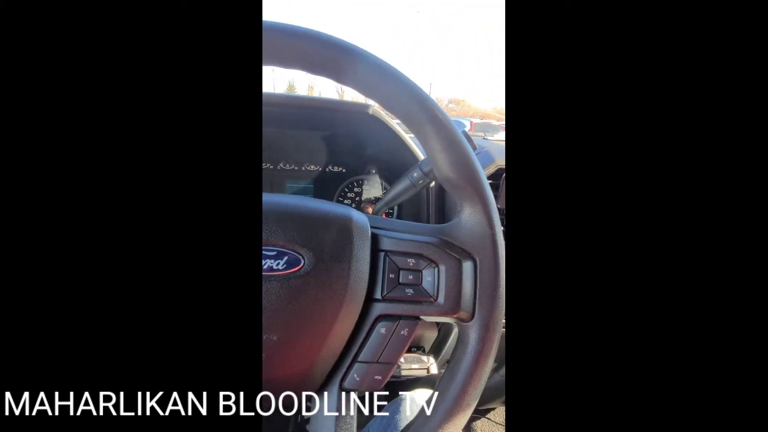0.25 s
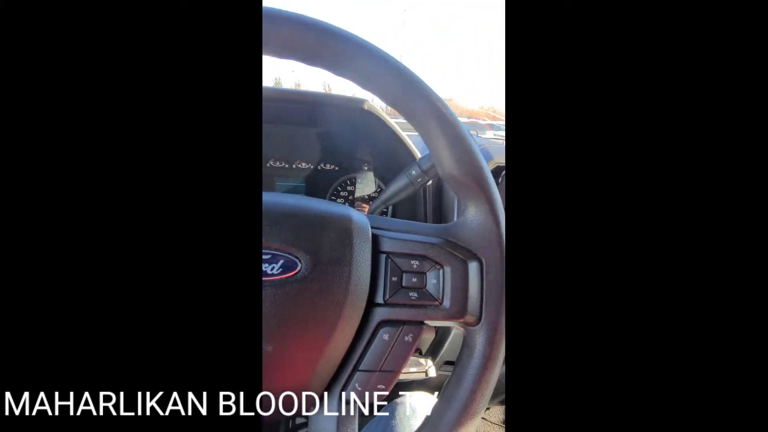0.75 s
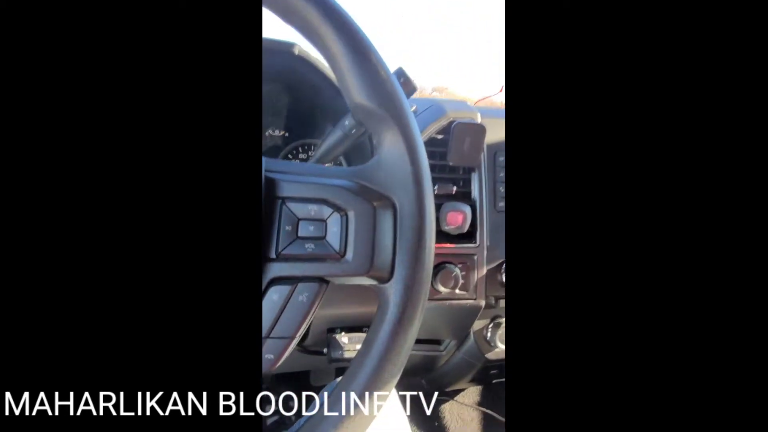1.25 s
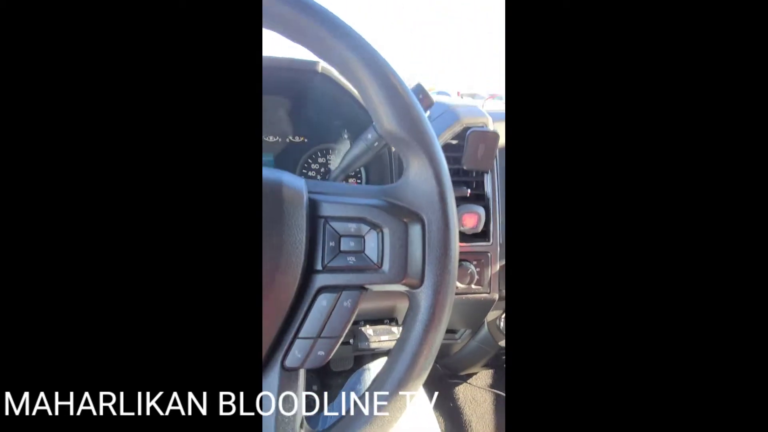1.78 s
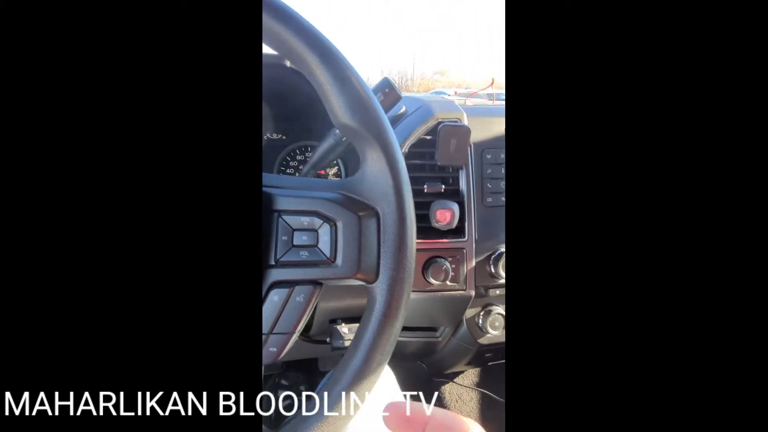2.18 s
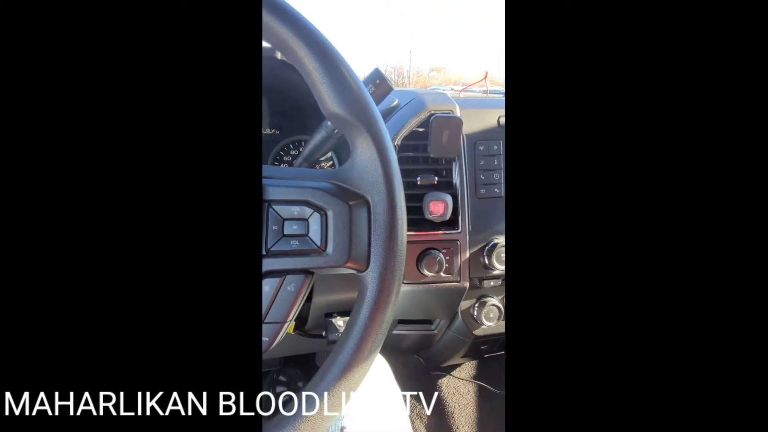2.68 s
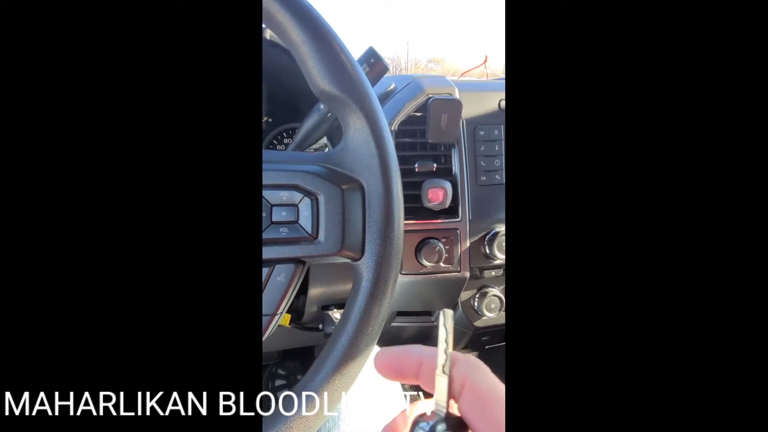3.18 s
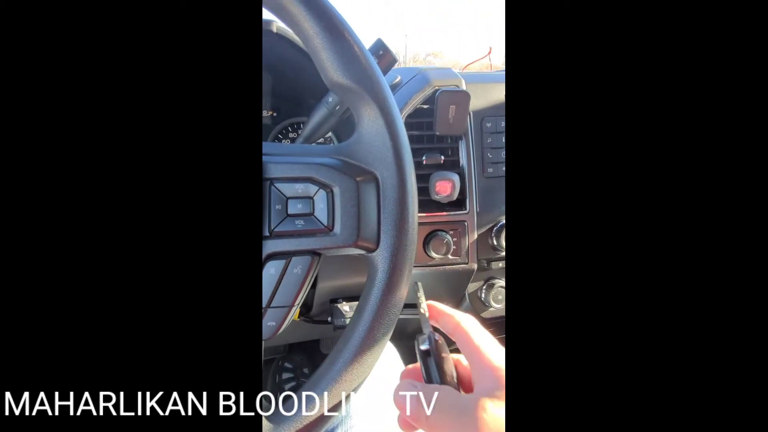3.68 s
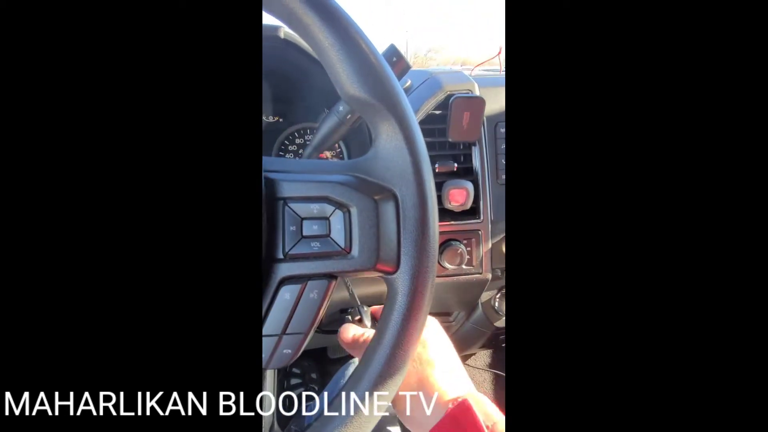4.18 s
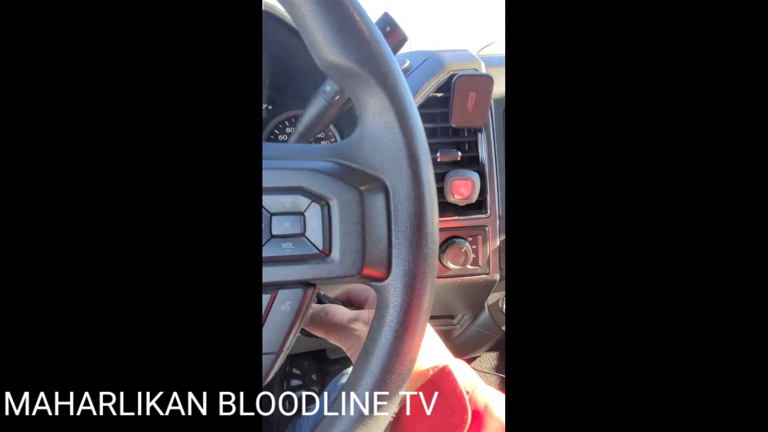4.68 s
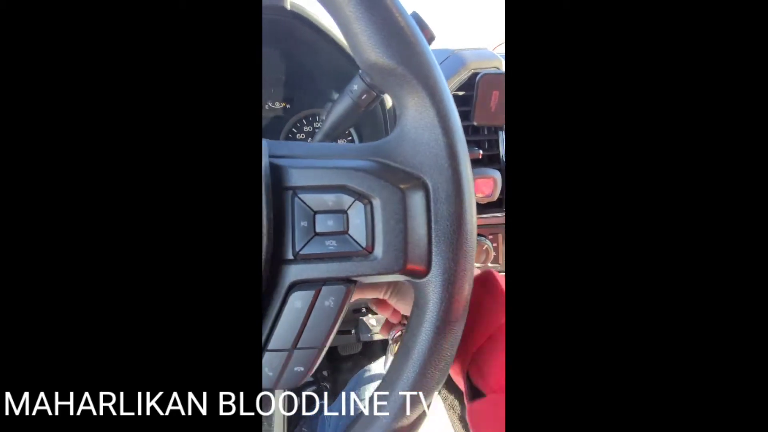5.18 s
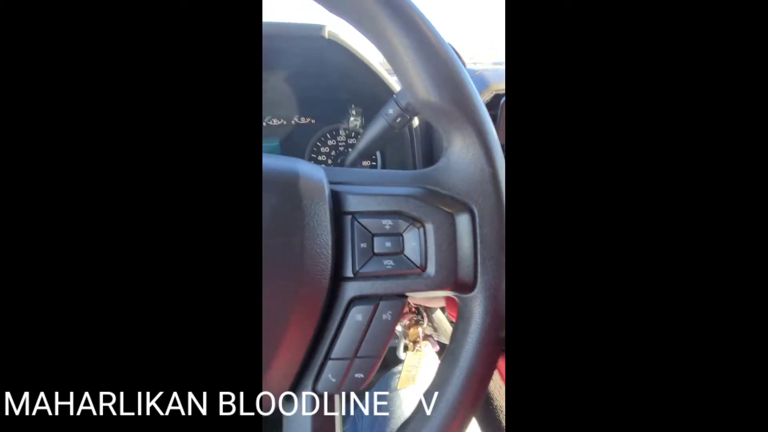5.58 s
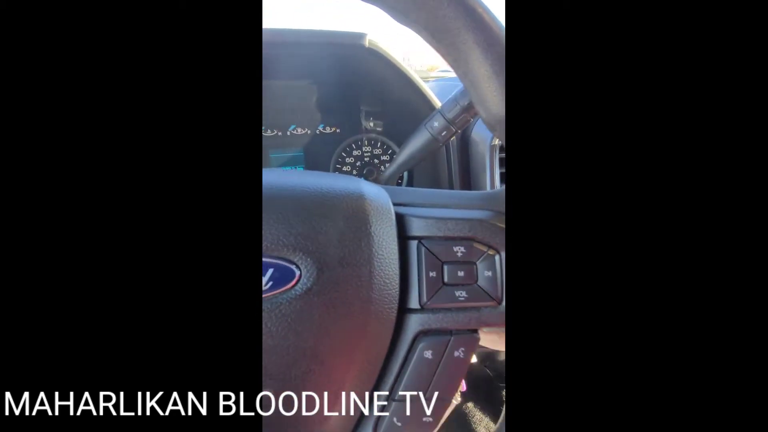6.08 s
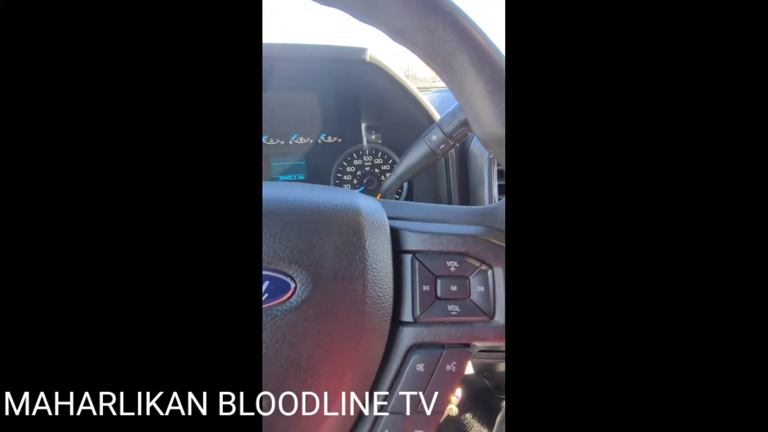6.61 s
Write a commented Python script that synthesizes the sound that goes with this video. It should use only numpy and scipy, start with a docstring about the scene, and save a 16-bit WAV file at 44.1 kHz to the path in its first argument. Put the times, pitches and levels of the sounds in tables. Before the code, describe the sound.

Keys jingle in the hand, a folding key snaps open, knocks hard on plastic and clacks in the ignition over a faint engine hum.

```python
"""A low engine hum and soft rustle fill the cab of a parked truck, heard from the driver's seat.
In the hand, a bunch of keys is picked up and sorted: noise ticks and short sine rings where keys meet.
A folding key flips open, knocks against the steering column (bursts through resonances), slides into
the ignition (slipping noise) and is turned with a clack, while the other keys swing and clink below it."""
import sys
import numpy as np
from scipy import signal
from scipy.fft import rfft, irfft, next_fast_len
from scipy.io import wavfile

SR = 44100
rng = np.random.default_rng(int(sys.argv[2]) if len(sys.argv) > 2 else 0)


def bounce(signal):
    """Save signal as a 16-bit WAV file at the path given by the first command-line argument."""
    frames = np.transpose(np.atleast_2d(signal))
    limited = np.clip(frames, -1, 1)
    pcm = np.round(limited * 32767).astype(np.int16)
    wavfile.write(sys.argv[1], SR, pcm)


N = 302085
TIME = np.arange(N) / SR
BLOW_SIZE = 4800  # samples in one blow
FIRST_10_MS = SR // 100  # samples over which a blow's level is set

# Levels of events and layers are relative: each source adds its own trim.
# engine: (time [s], low tone [dB], firing tone [dB], rumble [dB])
IDLE_LEVELS = [(0.0, -47.5, -60.5, -42), (3.64, -47.5, -57.5, -43.5), (6.6, -58, -45, -36.5),
               (6.85, -64, -49, -43.5)]
# centres about which the low tone and the firing tone waver: (low [Hz], firing [Hz])
IDLE_TONES_HZ = (36.6, 82.1)
# soft rustle in the cab: (time [s], level [dB])
RUSTLE_LEVELS = [(0.2, -53.5), (0.42, -59.5), (1.15, -54), (1.5, -58), (2.35, -57), (2.75, -61.5),
                 (2.97, -58), (3.53, -62), (3.8, -47.5), (4.3, -48), (4.56, -57.5), (4.95, -57),
                 (5.16, -47), (5.8, -55.5), (6.15, -52), (6.65, -63.5)]
# hiss: (time [s], level [dB])
HISS_LEVELS = [(0.6, -58), (1.1, -54), (1.43, -65.5), (1.88, -56.5), (2.35, -65), (2.44, -68), (2.7, -76.5),
               (2.98, -61), (3.42, -67.5), (3.75, -55), (3.97, -50.5), (4.3, -50), (4.66, -68.5),
               (5.16, -54), (5.35, -58.5), (6.1, -59), (6.85, -65.5)]

# knocks on the column and other hard plastic: (time [s], level [dB], hardness [octaves above DULL_HZ],
# treble fall [dB per octave], t60 [s])
KNOCKS_ON_PLASTIC = [(0.1198, -41, 1.53, 2, 0.071), (0.2, -42.5, 0.27, 2.5, .12),
                     (0.4568, -36.5, 2.5, 4.5, 0.03), (0.635, -35, 4.03, 0, 0.09),
                     (1.4709, -29, 3.6, 0, 0.022), (1.4755, -22, 3.87, 4, 0.079),
                     (1.5334, -27.5, 4.4, 5, 0.048), (1.5449, -25, 3.4, 0.5, 0.098),
                     (1.5591, -37, 4.8, 5, 0.078), (1.5745, -22, 3.9, 1.5, 0.072),
                     (2.285, -33, 4.7, 1, 0.022), (2.6784, -44.5, 4, 10, 0.046),
                     (3.8877, -19, 0.35, 4, .077), (3.9884, -18.5, 1.55, 7.5, 0.074),
                     (4.021, -27, 1.1, 24, 0.18), (4.0929, -30.5, 3.37, 0.5, 0.25),
                     (4.2316, -9.5, 0.55, 6, 0.12), (4.2797, -28.5, 1.73, 5.5, 0.044),
                     (4.3719, -25.5, 1.77, 10, 0.046), (4.4819, -28.5, 3.9, 5, 0.045),
                     (4.6238, -34, 4.54, 40, 0.18), (4.7118, -46, 3.5, 7, 0.25),
                     (4.8125, -41, 0.27, 3.5, .044), (4.95, -31.5, 2.05, -1, 0.051),
                     (4.9837, -34, 1.9, 6, 0.014), (5.0632, -37, 2.4, 25, 0.12),
                     (5.1098, -25, 1.94, 16, 0.1), (5.2185, -36, 1.4, 11, 0.036),
                     (5.2469, -20, 2.8, 17.5, 0.072), (5.3274, -26, 2.3, 5, 0.056),
                     (5.364, -21.5, 2.4, 3.5, 0.044), (5.4116, -23.5, 2.57, 2.5, 0.044),
                     (5.5686, -28, 2.4, 17, 0.06), (6.1741, -25.5, 2.84, 7, 0.067),
                     (6.1937, -22, 4.45, 1, .13), (6.2068, -29, 1.3, 4, .08), (6.2244, -31, 0.76, -1, 0.3),
                     (6.3285, -33, 1.4, 17, 0.094), (6.379, -48, 1.2, 12, 0.066),
                     (6.534, -32, 2.7, 18, .13), (6.7354, -44.5, 1.4, 1, .06)]
# resonances of the steering column and lock: (frequency [Hz], width [Hz], level [dB])
COLUMN_MODES = [(211, 33, 1), (390, 154, -0.5), (624, 60, 8), (733, 99, 3.5), (1137, 296, 1),
                (1392, 97, 6.5), (1640, 220, 0.5), (2180, 840, -1.5), (2870, 380, 1), (3205, 330, 3.5),
                (4540, 1200, 2.5), (5930, 8400, -7), (11700, 8200, -9)]
DULL_HZ, BASS_FALL_DB_PER_OCTAVE = 297, 10
EAR_LAG_S = 0.00032

# the clearest touches of key on key: (time [s], level [dB], sparkle over clack [dB])
KEY_TOUCHES = [(0.185, -45.5, 8), (0.5076, -66, -13.5), (0.7294, -38.5, 8), (0.74, -25, 18),
               (0.7925, -35, 18), (0.829, -34, 13), (0.8686, -28, 26), (0.879, -25, 16),
               (0.9994, -33.5, 18), (1.088, -36.5, 31), (1.122, -53, 11), (1.64, -27.5, 10.5),
               (1.7433, -47, 3), (1.791, -48, 4.5), (1.9643, -36.5, 17), (1.9725, -41, 8.5),
               (1.9892, -35, 34), (2.0008, -28.5, 15), (2.1623, -47, 13), (2.257, -43.5, 3),
               (2.288, -32, 0.5), (2.385, -53, 6), (2.733, -48, 0.5), (2.8411, -59, -4), (2.985, -59, 0),
               (3.014, -46.5, 2), (3.083, -32.5, 13.5), (3.2273, -50.5, 44), (3.3104, -45, 8),
               (3.3292, -35.5, 14), (4.075, -40, 5), (4.102, -33.5, 0.5), (4.921, -45, 7.5),
               (5.1894, -38.5, 7), (5.2276, -35, 7), (5.462, -39.5, 8), (5.738, -30, 13), (5.927, -39, 15),
               (5.9892, -32, 18), (6.0292, -34, 16), (6.065, -37.5, 9), (6.13, -30.5, 43),
               (6.28, -24.5, 22), (6.334, -26, 34), (6.438, -31, 21), (6.52, -28, 13), (6.536, -30.5, 12),
               (6.592, -44, 5), (6.6742, -48.5, 19), (6.7526, -29.5, 18.5)]
# modes of the bunch, damped by its neighbours; each touch shifts them: (frequency [Hz], level [dB])
BUNCH_MODES = [(6200, -12), (6800, -9), (7180, -7), (10120, -6), (10750, -7), (11120, -5), (11810, -2),
               (12190, 0), (12570, -1), (12745, 1), (13410, 0)]
TICK_SHARE = .35  # how far the tick lies from the sparkle towards the clack
# the bunch is shaken, so that keys slide and touch at random: (time [s], length [s], level [dB])
BUNCH_SHAKES = [(0.71, 0.21, -32), (0.93, 0.24, -43), (1.55, 0.13, -39), (1.958, 0.075, -41),
                (2.28, 0.053, -50), (2.99, 0.089, -41), (4.08, 0.035, -30), (5.51, 0.027, -40),
                (6.02, 0.03, -46.5), (6.12, 0.27, -37.5), (6.44, 0.051, -45), (6.645, .035, -46)]
SHAKE_ATTACK_S, SHAKE_RELEASE_S, TOUCHES_PER_S = 0.0043, 0.017, 70

# the blade grates on the ring and in the lock: (time [s], length [s], level [dB])
BLADE_GRATES = [(1.54, 0.03, -39), (1.615, 0.0074, -53), (5.028, 0.047, -51), (5.075, 0.051, -41),
                (5.195, 0.072, -42.5), (5.335, 0.085, -37), (5.572, 0.044, -40.5), (6.175, 0.069, -39),
                (6.285, 0.081, -51.5), (6.497, 0.016, -41)]
GRATE_ATTACK_S, GRATE_RELEASE_S = .009, 0.011
# the column shudders as the key is pushed home: (time [s], length [s], level [dB])
COLUMN_SHUDDERS = [(3.86, 0.038, -48), (4.0, 0.085, -40), (4.245, 0.13, -38.5)]
SHUDDER_ATTACK_S, SHUDDER_RELEASE_S = 0.0058, 0.032
# the lock creaks under the twisting key: (time [s], length [s], level [dB])
LOCK_CREAKS = [(4.635, 0.03, -49.5), (4.718, 0.016, -49.5), (5.722, 0.024, -41), (5.82, 0.057, -40.5)]
CREAK_ATTACK_S, CREAK_RELEASE_S = 0.0093, 0.01
# resonances of the creak: (frequency [Hz], width [Hz], level [dB])
CREAK_RESONANCES = [(1154, 88, -2.5), (1410, 13, 2), (2020, 230, -14), (3330, 410, -6.5)]

# one key swings free and rings: (time [s], level [dB], left over right [dB], which key)
FREE_CLINKS = [(2.003, -24, -12, "small"), (2.288, -30, -8, "flat"), (3.089, -33, -6, "long"),
               (4.918, -36.5, -16, "door"), (5.513, -31.5, -7, "door"), (5.740, -22, -1, "door"),
               (5.815, -44, -1, "door"), (5.930, -34, -19, "door"), (5.95, -34, -3, "door"),
               (5.99, -28.5, -1, "door"), (6.28, -33, -13, "small"), (6.646, -42, -7, "small")]
# modes of each key, by name; each strike makes the levels uneven: (frequency [Hz], level [dB], t60 [s])
KEY_MODES = {"small": [(10170, -2, .06), (11350, -9, .08), (11820, 0, .064), (12860, -5, .07),
             (13520, -7, .07)], "flat": [(10160, -18, .1), (11960, 0, .07)], "long": [(4662, -25, .2),
             (6794, -20, .08), (8484, -5, .1), (9706, -6, .1), (10060, -10, .08), (11970, 0, .04),
             (14340, -17, .16)], "door": [(6648, -14, .045), (6950, -18, .05), (10140, -8.5, .13),
             (12090, -16, .05), (12850, -12, .05), (13410, -4, .045)]}
CLINK_UNEVEN_DB = 2

FLIP_S, FLIP_DB = 2.5552, -9  # the blade hits its stop
# modes of the folding key's plastic fob: (frequency [Hz], level [dB], t60 [s])
FOB_MODES = [(2620, 9, 0.0027), (3150, -2.5, 0.013), (3540, -4.5, 0.014), (3640, -8, 0.014),
             (4630, -22, 0.014), (6960, -2.5, 0.004)]
# the lock snaps into a detent: (time [s], level [dB], left over right [dB])
LOCK_DETENTS = [(5.589, -21, -5), (6.4875, -14, -2)]
# modes of the lock cylinder: (frequency [Hz], level [dB], t60 [s])
LOCK_MODES = [(230, -27, .07), (620, -19, .05), (1040, -4, .05), (1165, -4, .06), (1320, -2, .06),
              (1450, -10, .04), (2150, -9, .055), (2750, -10, .05), (3400, -14, .04), (4100, -12, .04)]

# spectrum of the engine rumble: (frequency [Hz], relative density [dB per Hz])
RUMBLE_SPECTRUM = [(13, -43), (22, -5.5), (43, -5), (51, -7.5), (65, -9), (88, -18), (103, -23.5),
                   (156, -25), (183, -40.5), (220, -66), (290, -36), (480, -120)]
# spectrum of the rustle: (frequency [Hz], relative density [dB per Hz])
RUSTLE_SPECTRUM = [(76, -17), (130, -5.5), (257, -6), (479, -5.5), (573, -12), (695, -6), (818, -12),
                   (1220, -11), (1310, -9.5), (1720, -10), (2240, -13.5), (3110, -15.5), (3770, -33),
                   (4500, -16.5), (5850, -88), (9900, -120)]
# spectrum of the hiss: (frequency [Hz], relative density [dB per Hz])
HISS_SPECTRUM = [(1650, -14), (2800, -4), (4800, -5), (6340, -5.5), (7720, -7.5), (14900, -10),
                 (16000, -36)]
# spectrum of metal keys and lock pins: (frequency [Hz], relative density [dB per Hz])
JINGLE_SPECTRUM = [(710, -34), (1200, -22), (1380, -24.5), (1560, -18), (1810, -17.5), (2180, -18),
                   (3700, -13.5), (5840, -9), (6950, -3.5), (7660, -11), (8910, -5.5), (12300, -0.5),
                   (15200, -11.5), (16000, -41)]
# spectrum of the grating blade and the lock's snap: (frequency [Hz], relative density [dB per Hz])
GRATE_SPECTRUM = [(76, -17.5), (130, -20.5), (314, -15), (389, -13.5), (647, -12.5), (939, -13.5),
                  (1190, -8), (1530, -10), (1720, -13), (3700, -20), (9460, -32.5), (14000, -31.5)]
# spectrum of the shuddering column: (frequency [Hz], relative density [dB per Hz])
THUD_SPECTRUM = [(53, -12), (90, 3.5), (296, -3), (392, 4), (479, -9), (690, -6), (883, -10), (1320, -40),
                 (1500, -41), (1950, -45), (3300, -120)]

# where the hand holds the keys: (time [s], left over right [dB])
HAND_PAN = [(0, -7), (0.7, -8), (1.5, -11.5), (2.0, -9.5), (2.55, -7.5), (3.3, -8), (3.9, -3.5), (5.3, -3),
            (6.2, -3), (6.85, -2)]
# left-right likeness of noise: (frequency [Hz], correlation [-1 to 1])
LEFT_RIGHT_LIKENESS = [(30, 0.93), (250, 0.93), (550, 0.52), (1100, 0.069), (3000, 0.05), (15000, 0.027)]
CAB_T60_S = 0.1
CUTOFF_HZ = 15800


def from_db(db):
    """Decibels to gain."""
    return 10 ** (np.asarray(db) / 20)


def rms(x):
    """Root mean square."""
    return np.sqrt(np.mean(x ** 2) + 1e-20)


def in_time(rows):
    """Each column of a curve at every sample."""
    s, *columns = np.transpose(rows)
    return [np.interp(TIME, s, column) for column in columns]


def at_hz(points, hz):
    """Read a spectrum on a log-frequency axis."""
    f, value = np.transpose(points)
    return np.interp(np.log(hz + 1e-3), np.log(f), value)


def add(out, s, sound):
    """Mix a stereo sound in at time s."""
    start = max(round(s * SR), 0)
    out[:, start:start + sound.shape[1]] += sound[:, :N - start]


def panned(pan_db):
    """Left and right gains of constant power."""
    gains = from_db(np.array([pan_db, -pan_db]).reshape(2, -1) / 2)
    return gains / np.sqrt(np.mean(gains ** 2, axis=0))


def band_filters(edges):
    """Band-passes between neighbouring edges [Hz]."""
    return [signal.butter(2, pair, "band", fs=SR, output="sos") for pair in zip(edges, edges[1:])]


def colour(x, spectrum, ripple_db=0, spacing_hz=110):
    """Causal filter with this spectrum; a random ripple adds close-set metal resonances."""
    size = 2 * next_fast_len(x.shape[-1] // 2 + 512)
    hz = np.arange(size // 2 + 1) * SR / size + 1
    low_skirt = np.minimum(hz / spectrum[0][0], 1) ** 3
    high_skirt = np.minimum(spectrum[-1][0] / hz, 1) ** 3
    bumps = np.clip(rng.standard_normal(512), -2, 2)
    ripple = ripple_db * np.interp(hz / spacing_hz, np.arange(512), bumps)
    gain = from_db(at_hz(spectrum, hz) + ripple) * low_skirt * high_skirt
    cepstrum = irfft(np.log(gain + 1e-6))
    cepstrum[1:size // 2] *= 2  # folding the cepstrum gives minimum phase
    cepstrum[size // 2 + 1:] = 0
    return irfft(rfft(x, size) * np.exp(rfft(cepstrum)))[..., :x.shape[-1]]


def stereo_noise(size):
    """White noise, alike at both ears in the bass and unrelated in the treble."""
    padded = next_fast_len(size)
    mid, side = rfft(rng.standard_normal((2, padded)))
    hz = np.arange(len(mid)) * SR / padded
    alike = np.clip(at_hz(LEFT_RIGHT_LIKENESS, hz), -1, 1)
    shared = np.sqrt((1 + alike) / 2) * mid
    opposed = np.sqrt((1 - alike) / 2) * side * [[1], [-1]]
    return irfft(shared + opposed, padded)[:, :size]


def texture(spectrum, grain_db, grains_per_s, ripple_db=0):
    """Coloured noise, of rms 1 in mono, that comes in tiny slips of uneven strength."""
    slip = np.cumsum(rng.random(N) < grains_per_s / SR)
    strength = from_db(grain_db * np.clip(rng.standard_normal(N + 1)[slip], -2, 2))
    x = colour(stereo_noise(N) * strength, spectrum, ripple_db)
    return x / rms(x.mean(0))


def dying(t60):
    """Envelope of one blow: a fall of 60 dB in t60 seconds, never under 2 ms."""
    return from_db(-60 * np.arange(BLOW_SIZE) / SR / max(t60, .002))


def impact(t60, crack_db, crack_t60, cab_db, rise_t60):
    """A crack that builds as the parts chatter together, a short rattle and the cab's dense reflections."""
    crack = from_db(crack_db) * dying(crack_t60)
    reflections = from_db(cab_db) * dying(CAB_T60_S)
    envelope = crack + dying(t60) + reflections
    return stereo_noise(BLOW_SIZE) * envelope * (1 - dying(rise_t60))


def weighted(x, filters, levels_db):
    """Give each band of a blow its rms level over the first 10 ms."""
    bands = [signal.sosfilt(sos, x) for sos in filters]
    return sum(band * from_db(db) / rms(band[:, :FIRST_10_MS]) for band, db in zip(bands, levels_db))


def ringing(modes):
    """Decaying sines that reach each ear with a phase of their own."""
    out = 0
    for hz, db, t60 in modes:
        cycles = hz * TIME[:BLOW_SIZE] + rng.random((2, 1))
        out = out + from_db(db) * dying(t60) * np.sin(2 * np.pi * cycles)
    return out


def resonate(x, modes):
    """Parallel resonances of alternating sign; a wider one dies sooner."""
    out = 0
    for k, (hz, width, db) in enumerate(modes):
        r = np.exp(-np.pi * width / SR)
        poles = [1, -2 * r * np.cos(2 * np.pi * hz / SR), r * r]
        gain = (-1) ** k * from_db(db) * (1 - r * r) / 2
        out = out + gain * signal.lfilter([1, 0, -1], poles, x)
    return out


def strokes(rows, attack_s, release_s):
    """Envelope of hand movements: each swells, holds for its length and dies away."""
    out = 0
    for s, length, db in rows:
        swell, fade = (TIME - s) / attack_s, (s + length - TIME) / release_s
        out = out + from_db(db) * np.exp(np.clip(np.minimum(swell, fade), -20, 0))
    return out


def background(rustle_db=-2.74, hiss_db=0.0, rumble_db=-3.0, tones_db=-2, pan_db=-3.5, waver_hz=0.33):
    """An engine idles, two wavering tones over rumble, under the soft rustle of clothes and hiss."""
    (mid_db,), (high_db,) = in_time(RUSTLE_LEVELS), in_time(HISS_LEVELS)
    *tone_levels_db, low_db = in_time(IDLE_LEVELS)
    rustle = from_db(mid_db + rustle_db) * texture(RUSTLE_SPECTRUM, grain_db=2.5, grains_per_s=200)
    hiss = from_db(high_db + hiss_db) * texture(HISS_SPECTRUM, grain_db=1.5, grains_per_s=90)
    rumble = from_db(low_db + rumble_db) * texture(RUMBLE_SPECTRUM, grain_db=-3.5, grains_per_s=4)
    waver = waver_hz * np.interp(TIME, np.linspace(0, TIME[-1], 20), rng.standard_normal(20))
    tones = 0
    for hz, db in zip(IDLE_TONES_HZ, tone_levels_db):
        phase = 2 * np.pi * np.cumsum(hz + waver) / SR
        tones = tones + from_db(db + tones_db) * np.sqrt(2) * np.sin(phase)
    return (rustle + hiss) * panned(pan_db) + rumble + tones


def knocks(level_db=-1.5, crack_share=1.0, push_db=5, contact_hz=1200):
    """A blunt push, reaching the right ear first, and a rattle ring the column; harder contacts peak higher."""
    edges = np.array([130, 500, 950, 2400, 5000, 17000])
    out, filters = np.zeros((2, N)), band_filters(edges)
    octaves = np.log2(np.sqrt(edges[:-1] * edges[1:]) / DULL_HZ)  # band centres
    t = TIME[:BLOW_SIZE] - np.array([[EAR_LAG_S], [0]])
    push = (t >= 0) * np.exp(-2 * np.pi * contact_hz * np.abs(t))
    push = from_db(push_db) * push / push.sum(1, keepdims=True)
    for s, db, hardness, treble_fall, t60 in KNOCKS_ON_PLASTIC:
        rattle = impact(t60, crack_db=-69, crack_t60=crack_share * t60, cab_db=-37.0, rise_t60=0.0017)
        blow = rattle / np.linalg.norm(rattle) + push
        bass_loss = BASS_FALL_DB_PER_OCTAVE * (hardness - octaves)
        treble_loss = treble_fall * (octaves - hardness)
        bands_db = db - np.maximum(bass_loss, treble_loss)
        add(out, s, weighted(resonate(blow, COLUMN_MODES), filters, bands_db))
    return from_db(level_db) * out


def touch(bright_db, filters, ring_db=-14, ring_t60=0.025, uneven_db=7, detune=0.0058):
    """A touch ticks through the resonances of whichever keys meet, and sets the bunch ringing."""
    chatter = impact(t60=0.067, crack_db=22.5, crack_t60=0.0073, cab_db=-8.0, rise_t60=0.019)
    tick = colour(chatter, JINGLE_SPECTRUM, ripple_db=5.5)
    tick = weighted(tick, filters, (-bright_db, -TICK_SHARE * bright_db, 0))  # clack, tick, sparkle
    modes = [(hz * (1 + detune * rng.uniform(-1, 1)), db + uneven_db * rng.uniform(-1, 1), ring_t60)
             for hz, db in BUNCH_MODES]
    return tick + from_db(ring_db) * ringing(modes)


def key_touches(level_db=4.0, swing_db=5.0):
    """Single clear touches of metal on metal, each a little to one side of the hand."""
    out, filters = np.zeros((2, N)), band_filters((1500, 5000, 9500, 17000))
    for s, db, bright_db in KEY_TOUCHES:
        pan = panned(swing_db * rng.standard_normal())
        add(out, s, from_db(db + level_db) * touch(bright_db, filters) * pan)
    return out


def shaken_bunch(touch_db=-1, slide_db=-5, bright_db=11, uneven_db=5, count=12, size=900):
    """While the bunch is shaken its keys slip over each other and touch at uneven intervals."""
    out, filters = np.zeros((2, N)), band_filters((1500, 5000, 9500, 17000))
    shaking = strokes(BUNCH_SHAKES, SHAKE_ATTACK_S, SHAKE_RELEASE_S)
    pairs = [touch(bright_db, filters) for _ in range(count)]
    for k, (late, strength, pair) in enumerate(rng.random((size, 3))):
        s = (k + late) / TOUCHES_PER_S  # one touch at random within each slot
        if s < TIME[-1]:
            gain = shaking[int(s * SR)] * from_db(touch_db + uneven_db * (2 * strength - 2))
            add(out, s, gain * pairs[int(pair * count)])
    slides = texture(JINGLE_SPECTRUM, grain_db=6.5, grains_per_s=400, ripple_db=5)
    return out + from_db(slide_db) * shaking * slides


def friction(grate_db=1.5, shudder_db=-2, creak_db=-3.5):
    """Stick and slip: the blade grates, the lock creaks and the column shudders under the hand."""
    grit = texture(GRATE_SPECTRUM, grain_db=5.5, grains_per_s=450, ripple_db=3.5)
    creak = resonate(grit, CREAK_RESONANCES)
    thud = texture(THUD_SPECTRUM, grain_db=4, grains_per_s=300)
    grates = strokes(BLADE_GRATES, GRATE_ATTACK_S, GRATE_RELEASE_S) * grit
    creaks = strokes(LOCK_CREAKS, CREAK_ATTACK_S, CREAK_RELEASE_S) * creak / rms(creak)
    shudders = strokes(COLUMN_SHUDDERS, SHUDDER_ATTACK_S, SHUDDER_RELEASE_S) * thud
    return from_db(grate_db) * grates + from_db(creak_db) * creaks + from_db(shudder_db) * shudders


def key_clinks(level_db=7, rise_t60=0.001):
    """Single keys swing free and ring clear; each strike favours other modes."""
    out = np.zeros((2, N))
    for s, db, pan_db, key in FREE_CLINKS:
        modes = [(hz, mode_db + CLINK_UNEVEN_DB * rng.uniform(-1, 1), t60)
                 for hz, mode_db, t60 in KEY_MODES[key]]
        clink = ringing(modes) * (1 - dying(rise_t60))
        add(out, s, from_db(db + level_db) * clink * panned(pan_db))
    return out


def blade_flip(snap_db=-14, tick_db=-17, ring_rise_t60=.0015, low_cut_hz=1400):
    """The sprung blade flips out and hits its stop; the small fob radiates no bass."""
    out, filters = np.zeros((2, N)), band_filters((2400, 5000, 17000))
    burst = impact(t60=0.018, crack_db=-15, crack_t60=0.007, cab_db=-23.5, rise_t60=0.0042)
    snap = weighted(burst, filters, (snap_db, tick_db))
    click = ringing(FOB_MODES) * (1 - dying(ring_rise_t60)) + snap
    click = signal.sosfilt(signal.butter(2, low_cut_hz, "high", fs=SR, output="sos"), click)
    add(out, FLIP_S, from_db(FLIP_DB) * click)
    return out


def detents(snap_db=-14, pins_db=-10):
    """The sprung pins snap home and ring the lock cylinder."""
    out = np.zeros((2, N))
    for s, db, pan_db in LOCK_DETENTS:
        burst = impact(t60=0.2, crack_db=17, crack_t60=.02, cab_db=-16, rise_t60=0.0065)
        snap = colour(burst, GRATE_SPECTRUM)
        pins = colour(burst, JINGLE_SPECTRUM, ripple_db=5)
        clack = ringing(LOCK_MODES) + from_db(snap_db) * snap / rms(snap[:, :FIRST_10_MS])
        clack = clack + from_db(pins_db) * pins / rms(pins[:, :FIRST_10_MS])
        add(out, s, from_db(db) * clack * panned(pan_db))
    return out


def scene():
    """Everything heard from the driver's seat; the sounds in the hand move with it."""
    hand_db, = in_time(HAND_PAN)
    in_hand = knocks() + key_touches() + shaken_bunch() + friction() + blade_flip()
    return background() + in_hand * panned(hand_db) + key_clinks() + detents()


def record(dry):
    """The microphone channels lose everything far above CUTOFF_HZ in a steep cut."""
    return signal.sosfilt(signal.ellip(10, .2, 80, CUTOFF_HZ, fs=SR, output="sos"), dry)


dry = scene()
out = record(dry)
bounce(out)
```